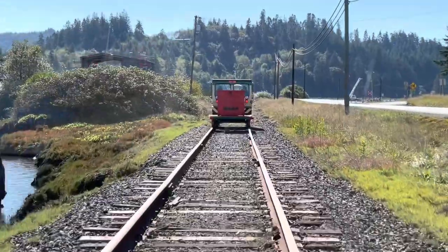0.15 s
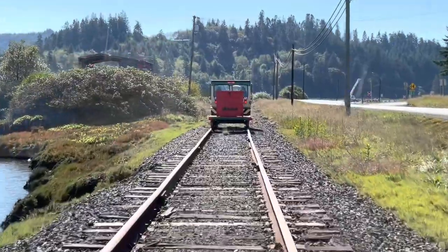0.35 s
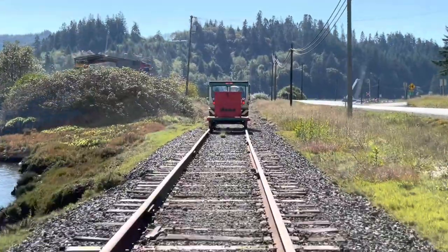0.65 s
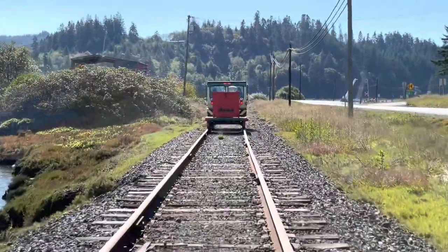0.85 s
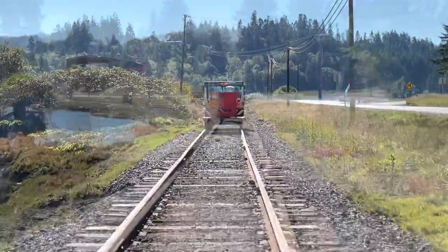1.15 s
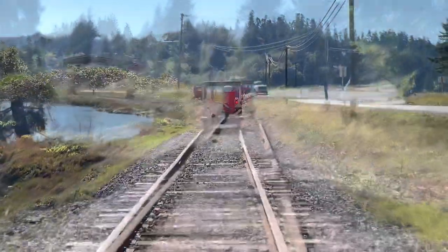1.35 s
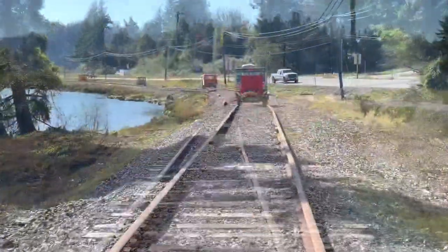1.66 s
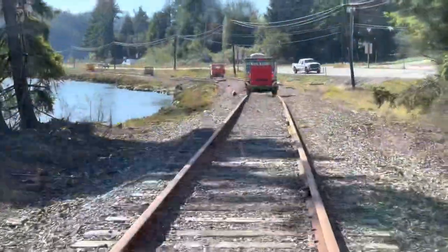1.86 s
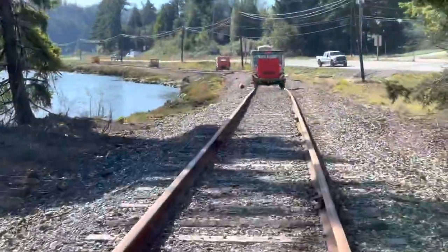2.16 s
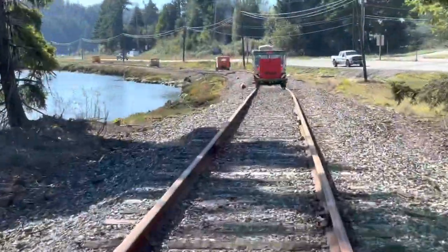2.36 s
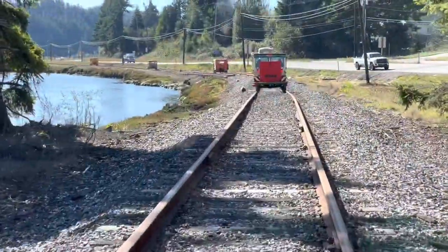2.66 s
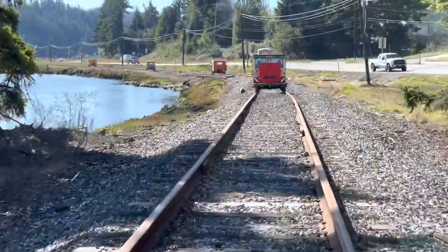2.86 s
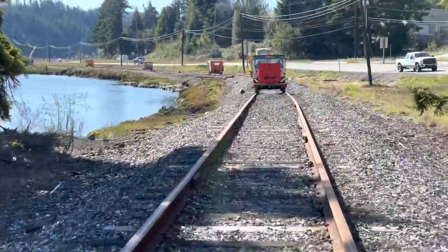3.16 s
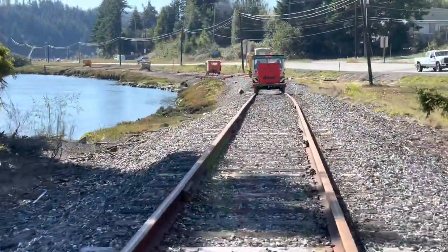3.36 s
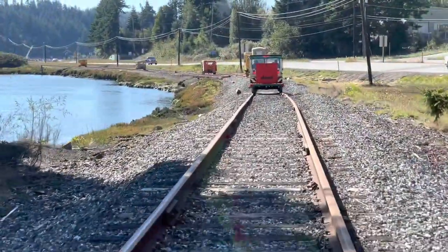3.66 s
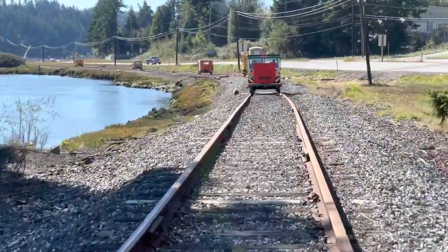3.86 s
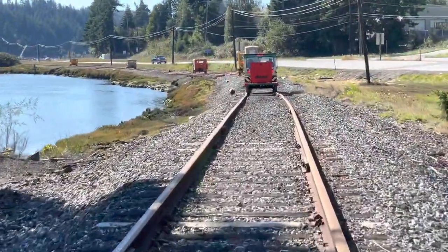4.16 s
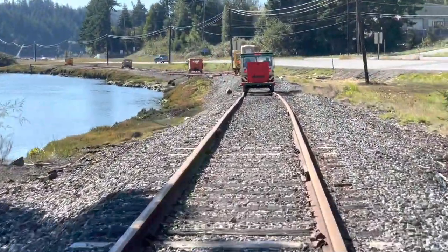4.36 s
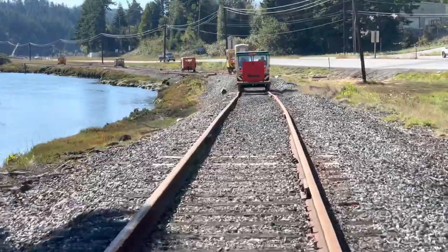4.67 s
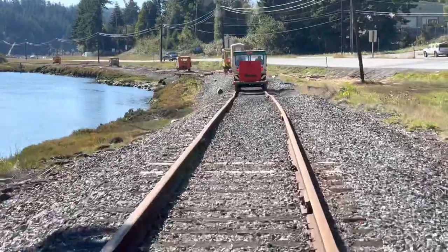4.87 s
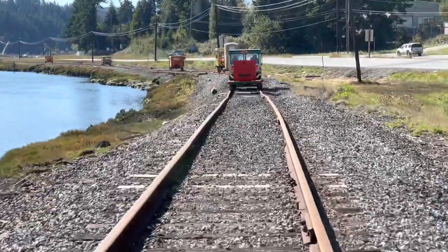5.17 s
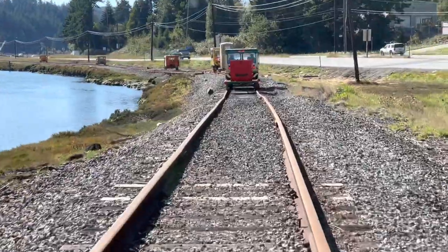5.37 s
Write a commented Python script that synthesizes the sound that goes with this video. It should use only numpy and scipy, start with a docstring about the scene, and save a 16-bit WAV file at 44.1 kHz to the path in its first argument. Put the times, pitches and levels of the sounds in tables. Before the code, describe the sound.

Continuous ride noise, close and in stereo, without voices. A low engine throb and grainy rolling roar fill everything, swelling a few times per second. Fast and whining at first, with brief wheel howls, it blends smoothly into a slower stretch with a buzzing panel drone, strongest around 3.7 to 4.5 seconds. Loose metal pings, bright ticks, jolting rattles and soft low track thumps scatter throughout, ending with a ringing wheel clank.

```python
"""A twin-cylinder engine throbs over the roar of steel wheels on rails: a ride in a small rail motorcar.
Throb: sines locked to the crank. Roar: noise through body and wheel modes, surging about once a wheel turn.
A faster stretch with whine (tones geared to the engine) and short howls dissolves into a slower, droning one.
Treble noise chuffs with the firings and ticks; loose metal pings (decaying modes), jolts rattle (noise bursts).
Track knocks thump the floor (decaying sines); now and then a joint makes a wheel ring (struck modes)."""
import sys
import numpy as np
from scipy import signal
from scipy.fft import rfft, irfft, next_fast_len
from scipy.io import wavfile

SR = 44100
rng = np.random.default_rng(int(sys.argv[2]) if len(sys.argv) > 2 else 0)


def wav_out(sig):
    """Save sig, one row per channel (or a flat mono array), as 16-bit PCM at SR to the path in sys.argv[1]."""
    wavfile.write(sys.argv[1], SR, np.round(np.clip(np.atleast_2d(sig).T, -1, 1) * 32767).astype(np.int16))


N = 242991
TIME = np.arange(N) / SR
SIZE = next_fast_len(N)
HZ = np.maximum(np.arange(SIZE // 2 + 1) * SR / SIZE, 1)


def from_db(db):
    """Decibels to gain."""
    return 10 ** (np.asarray(db) / 20)


def rms_one(x):
    """Scale to rms 1."""
    return x / np.sqrt(np.mean(x ** 2) + 1e-20)


def in_time(rows):
    """Each value column of a time table, interpolated at every sample."""
    s, *columns = np.transpose(rows)
    return [np.interp(TIME, s, c) for c in columns]


def over_hz(points):
    """A frequency table at every bin, linear on a log-frequency axis."""
    hz, value = np.transpose(points)
    return np.interp(np.log(HZ), np.log(hz), value)


def drift(rate_hz):
    """Low-passed noise of rms 1, corner near rate_hz."""
    spectrum = rfft(rng.standard_normal(SIZE)) / (1 + (HZ / rate_hz) ** 2)
    return rms_one(irfft(spectrum, SIZE)[:N])


def resonance(hz, width_hz):
    """Complex response of one mode, 1 at its peak."""
    return 1 / (1 + 1j * (HZ ** 2 - hz ** 2) / (HZ * width_hz))


# left-right likeness of the noises: f/Hz, correlation
LIKENESS = [(90, 1), (170, .9), (280, .68), (390, .75), (520, .55), (800, .2), (1200, .55), (2000, .94),
            (3500, .83), (6000, .7), (7500, .8), (8800, .97), (11000, .85), (13000, .97)]


def stereo_noise(gain):
    """Noise coloured by gain, partly correlated between the sides; rms 1."""
    alike = np.clip(over_hz(LIKENESS), -1, 1)
    mid, side = rfft(rng.standard_normal((2, SIZE))) * gain
    sides = np.sqrt(1 + alike) * mid + np.sqrt(1 - alike) * side * [[1], [-1]]
    return rms_one(irfft(sides, SIZE)[:, :N])


def rough_tone(hz, wander_hz, rough):
    """Tone of rms 1 with wandering pitch and trembling level."""
    turns = np.cumsum(hz + wander_hz * drift(25.37)) / SR
    return rms_one((1 + rough * drift(22)) * np.sin(2 * np.pi * turns))


def swell(s, length):
    """Cosine-squared rise and fall, 1 at time s."""
    return np.cos(np.pi * np.clip((TIME - s) / length, -.5, .5)) ** 2


def dying(s, t60, rise):
    """Envelope of a blow at time s: exponential rise, decay of 60 dB in t60."""
    age = np.maximum(TIME - s, 0)
    return (1 - np.exp(-age / rise)) * from_db(-np.minimum(60 * age / t60, 200))


def puffs(turns, decay, rise):
    """Quick rise and decay each turn (both in turns), each of random strength; rms 1."""
    within = turns % 1
    which = np.floor(turns - turns.min() // 1).astype(int)
    strength = from_db(1.1 * rng.standard_normal(400))[which % 400]
    return rms_one(strength * (1 - np.exp(-within / rise)) * np.exp(-within / decay))


def firings(turns, depth, second_db, decay, rise):
    """Gain that swells twice per engine cycle, strong then weak; rms 1."""
    strong, weak = (puffs(turns - lag, decay, rise) for lag in (0, .5))
    power = strong ** 2 + (from_db(second_db) * weak) ** 2
    return rms_one(np.sqrt(1 + abs(depth) * power))


# exhaust lines, relative: multiple of the cycle rate, level/dB
FAST_ORDERS = [(2, -27), (3, -27), (4, -5.5), (5, -19), (6, 0), (7, -21), (7.5, -12), (8, -20), (10, -12),
               (12, -19), (13, -25), (16, -24), (17, -26), (22, -30), (26, -21), (30, -27), (32, -27),
               (33, -30), (42, -29), (44, -26)]
SLOW_ORDERS = [(3.5, -25), (4, -11), (5, -17.5), (5.5, -22), (6, 0), (7, -16), (7.5, -20), (8.5, -18),
               (10, -18), (12, -19), (14, -18.5), (18, -31), (24, -32), (26, -26), (28, -23), (30, -29),
               (32, -30), (34, -32), (36, -27), (37, -32), (39, -33), (40, -27), (42, -31)]
CHUG_DB, CHUG_RATE_HZ = .6, 14   # drift of the throb's strength


def exhaust(cycles, orders, wobble, uneven):
    """Low throb and growl: lines locked to the crank, with slight drift in timing and in each line's level."""
    turns = cycles + wobble * drift(22)
    lag, growl_from_order, growl_scatter = .08, 20, .8   # cycles, -, turns
    lines = 0
    for k, db in orders:
        # the growl lines' phases are scattered over less than a full turn
        phase = rng.random() * (growl_scatter if k > growl_from_order else 1)
        level = from_db(db) * (1 + uneven * drift(5.0))
        lines = lines + level * np.sin(2 * np.pi * (k * (turns - lag) + phase))
    return rms_one(lines * from_db(CHUG_DB * drift(CHUG_RATE_HZ)))


# wheels bear down about once a turn: t/s of the top, length/s, load
SURGES = [(0.207, 0.13, 0.98), (0.432, 0.28, 1.4), (0.69, 0.16, 1.8), (0.956, 0.14, 1.2), (1.2, 0.16, 1.4),
          (1.475, 0.49, 1.3), (1.77, 0.38, 2.2), (2.036, 0.33, 0.65), (2.294, 0.19, 1.5), (2.657, 0.1, 1.6),
          (2.825, 0.058, 2), (3.07, 0.23, 2.2), (3.517, 0.15, 1.7), (3.83, 0.27, 1.7), (4.153, .17, 2.5),
          (4.325, 0.07, 2.4), (4.483, 0.35, 1.3), (4.66, 0.071, 0.39), (4.85, 0.43, 1.7),
          (5.157, 0.28, 1.2), (5.456, 0.16, 1.7)]
TRACK_ROUGH, TRACK_RATE_HZ = .3, 8   # load flutter from the uneven rail head


def wheel_load():
    """Load of the wheels on the rails: surges plus flutter; mean 0."""
    load = sum(size * swell(s, length) for s, length, size in SURGES)
    load = load + TRACK_ROUGH * drift(TRACK_RATE_HZ)
    return load - load.mean()


# rolling noise colour, relative: f/Hz, density level/dB
FAST_ROAR = [(20, -29), (45, -7), (75, -4.5), (130, 1.5), (190, -6.5), (250, -6.5), (315, -17.5),
             (460, -10.5), (580, -18.5), (900, -18.5), (1300, -26), (1900, -26.5), (4000, -33), (8000, -51)]
SLOW_ROAR = [(20, -20), (30, -10), (45, -6.5), (70, 0), (120, 1), (170, 0.5), (225, -8.5), (270, -5),
             (310, -14.5), (420, -10.5), (580, -16), (700, -16), (1000, -17), (1900, -28), (4000, -36),
             (8000, -48.5)]
# body and wheel resonances: f/Hz, width/Hz, lift/dB
FAST_MODES = [(388, 90, 5), (644, 40, 11), (830, 36, 5), (1114, 63, 10), (1310, 45, 8.5), (1570, 33, 8.5),
              (1880, 49, 3.5), (2270, 55, 3.5), (2910, 110, 5.5), (3770, 130, 4), (4880, 24, 11)]
SLOW_MODES = [(397, 51, 5.7), (500, 26, 2.3), (543, 21, 3.2), (585, 33, 8.1), (950, 12, 4.5),
              (1845, 40, 4.5), (2200, 37, 6.3), (2750, 78, 5.7), (2926, 41, 6.3), (3140, 29, 2.5),
              (3810, 130, 4), (4920, 94, 4.1)]
# engine effort, also drives slow throb, pings and singing: t/s, level/dB
EFFORT = [(0, -0.5), (.9, 2), (1.7, -1), (2.7, 0.5), (4, 0.5), (5.5, 0.5)]
BODY_SWELL_DB_PER_LOAD, SIZZLE_SWELL_DB_PER_LOAD = 1.55, .5


def roar(cycles, load, spectrum, modes, beat, rumble_db, body_db, sizzle_db):
    """Rolling noise through body and wheel modes; the firings modulate the body band."""
    lift = 1
    for hz, width, db in modes:
        lift = lift + (from_db(db) ** 2 - 1) * np.abs(resonance(hz, width)) ** 2
    gain = from_db(over_hz(spectrum)) * np.sqrt(np.maximum(lift, .1))
    shake = firings(cycles, beat, second_db=-6, decay=.1, rise=.15)
    below = 1 / (1 + (HZ / 300) ** 6)
    above = 1 / (1 + (1700 / HZ) ** 6)
    # floor rumbles with the engine, body roars with the track, rails sizzle
    rumble_level = from_db(rumble_db + in_time(EFFORT)[0])
    rumble = rumble_level * stereo_noise(gain * np.sqrt(below))
    body_level = from_db(body_db + BODY_SWELL_DB_PER_LOAD * load)
    body = body_level * stereo_noise(gain * np.sqrt((1 - below) * (1 - above)))
    sizzle_level = from_db(sizzle_db + SIZZLE_SWELL_DB_PER_LOAD * load)
    sizzle = sizzle_level * stereo_noise(gain * np.sqrt(above))
    return rumble + body * shake + sizzle


# drive lines, relative: multiple of the cycle rate, level/dB
WHINE_LINES = [(26.3, 1), (68, -8), (71, -7)]
WHINE_SWELL_DB_PER_LOAD = 6


def whine(cycles, load, wander_hz, level_db):
    """Rough drive tones geared to the engine, surging with wheel load."""
    cycles_per_s = np.gradient(cycles) * SR
    lines = sum(from_db(db) * rough_tone(multiple * cycles_per_s, wander_hz, rough=0.27)
                for multiple, db in WHINE_LINES)
    return from_db(level_db + WHINE_SWELL_DB_PER_LOAD * load) * rms_one(lines)


# engine hiss colour, relative: f/Hz, density level/dB
HISS = [(2000, -4), (4500, 6), (7000, 4.5), (9000, 2), (11000, 7), (13500, 3.5), (15500, -1)]
HISS_SWELL_DB_PER_LOAD = .9


def hiss(cycles, opens, chuff, second_db):
    """Bright, flickering noise chuffing twice per engine cycle, deepest at the very top; rms 1."""
    colour = from_db(over_hz(HISS))
    top = 1 / (1 + (8000 / HZ) ** 8)
    out = 0
    for part, depth in ((top, chuff), (1 - top, .3 * chuff)):
        gain = colour * np.sqrt(part)
        chuffs = firings(cycles - opens, depth, second_db, decay=.16, rise=.07)
        out = out + np.linalg.norm(gain) * stereo_noise(gain) * chuffs   # norm keeps the band balance
    return rms_one(out * from_db(.55 * drift(14)))


# faint wheel tones: f/Hz, level/dB before effort and patches, wander/Hz
SINGING = [(2196, -49, 32), (2940, -54, 28)]


def singing(rough, patchy_db):
    """Rolling contact keeps two wheel modes sounding hoarsely, in uneven patches, louder with effort."""
    out = 0
    for hz, db, wander_hz in SINGING:
        level = from_db(db + in_time(EFFORT)[0] + patchy_db * np.tanh(drift(7)))
        out = out + level * rough_tone(hz, wander_hz, rough)
    return out


# loose metal modes: f/Hz, relative level/dB, t60/s
PING_MODES = [(1867, 1, 0.04), (2185, -2.5, 0.075), (2935, -7, 0.07), (4811, -16, 0.08)]
# loudest taps: t/s, level/dB before loud_db
TAPS = [(.41, -28), (.61, -24), (1.025, -27), (3.13, -22), (3.325, -23), (3.55, -26), (4.19, -25),
        (4.45, -25), (4.85, -37), (5.3, -24)]


def pings(per_s, spread_db, light_db, loud_db, follows):
    """Random light taps, harder with effort, and a few loud ones ring the same decaying metal modes."""
    count = int(per_s * N / SR)
    at = ((np.arange(count) + rng.random(count)) / count * (N - 1)).astype(int)
    loud_at = [int(s * SR) for s, _ in TAPS]
    shaken_db = light_db + follows * in_time(EFFORT)[0][at]
    out = 0
    for hz, db, t60 in PING_MODES:
        taps = np.zeros(SIZE)
        # light taps draw a strength of their own for each mode
        taps[at] = from_db(shaken_db + spread_db * np.clip(rng.standard_normal(count), -2, 2))
        taps[loud_at] = from_db([tap_db + loud_db for _, tap_db in TAPS])
        ring = from_db(db) * dying(0, t60, rise=0.0073) * np.sin(2 * np.pi * hz * TIME)
        out = out + rfft(taps) * rfft(ring, SIZE)
    return irfft(out, SIZE)[:N]


# running gear howls: t/s of the top, length/s, nominal f/Hz, level/dB before gain_db
HOWLS = [(.11, .2, 632, -25), (.225, .12, 600, -29), (.225, .17, 1072, -26), (.225, .1, 835, -32),
         (.43, .1, 845, -33), (.3, .13, 624, -26), (.4, .15, 645, -27), (.495, .13, 629, -25),
         (.63, .14, 1120, -31), (.695, .17, 650, -22), (.71, .14, 1076, -28), (.965, .17, 644, -24),
         (.96, .12, 1125, -33), (1.08, .09, 688, -31), (1.21, .16, 628, -29)]


def howls(wander_hz, rough, gain_db, bend):
    """Short, hoarse, wavering tones; pitch lifts with the swell by the share bend."""
    out = 0
    for s, length, hz, db in HOWLS:
        arch = swell(s, length)
        pitch_hz = hz * (1 + bend * (arch - .7))
        out = out + from_db(db + gain_db) * arch * rough_tone(pitch_hz, wander_hz, rough)
    return out


# jolts: t/s, level/dB before gain_db, centre f/Hz
RATTLES = [(.033, -27, 970), (.225, -39, 1100), (0.417, -24, 1230), (.598, -26, 1700), (.686, -28, 1100),
           (.948, -30, 1400), (1.11, -31, 900), (1.675, -29, 1100), (1.94, -25, 868), (2.312, -24.5, 680),
           (2.64, -22, 556), (2.999, -23, 750), (3.12, -31, 1700), (3.739, -32, 900), (3.79, -27, 700),
           (4.79, -28, 1490), (4.875, -21, 460), (5.144, -30, 600)]


def rattles(t60, grain_db, width, gain_db):
    """Each jolt is a dying burst of grainy band noise; width is a share of the centre frequency."""
    grain = rms_one(from_db(grain_db * drift(150)))
    out = 0
    for s, db, hz in RATTLES:
        clatter = stereo_noise(resonance(hz, width * hz) ** 2)
        out = out + from_db(db + gain_db) * dying(s, t60, rise=0.0045) * clatter
    return grain * out


# engine ticks: t/s, level/dB before gain_db
TICKS = [(.26, -38), (.69, -39), (1.832, -32), (2.888, -37), (3.036, -36), (3.481, -30), (4.052, -32),
         (4.343, -37), (4.42, -36), (4.703, -36), (4.92, -37)]


def ticks(t60, gain_db):
    """Short, very bright metal ticks: enveloped noise around 12.6 kHz."""
    envelope = sum(from_db(db + gain_db) * dying(s, t60, rise=.001) for s, db in TICKS)
    return envelope * stereo_noise(resonance(12600, 4500))


# dull track knocks: t/s, level/dB before gain_db, f/Hz
THUMPS = [(0.529, -10, 121), (.715, -10, 135), (.975, -13, 175), (1.905, -8.5, 159), (2.057, -14, 159),
          (2.447, -12, 175), (2.543, -12, 172), (2.642, -13, 153), (2.739, -14, 178), (2.806, -8, 180),
          (3.345, -10, 169), (3.463, -12, 191), (3.824, -13, 175), (4.164, -13, 255), (4.2, -11, 151),
          (4.364, -10, 135), (4.584, 0, 160), (4.686, -7.5, 150), (4.983, -5.5, 153)]


def thumps(t60, rise, gain_db):
    """The floor booms briefly at each knock: a decaying low sine."""
    return sum(from_db(db + gain_db) * dying(s, t60, rise) * np.sin(2 * np.pi * hz * (TIME - s))
               for s, db, hz in THUMPS)


# panel swells: t/s of the top, length/s, level/dB
DRONE_SWELLS = [(2.05, 0.12, -36), (3.43, 0.31, -30), (3.68, 0.25, -21.5), (3.82, 0.18, -20.5),
                (3.93, 0.18, -22.5), (4.17, 0.096, -26), (4.47, 0.12, -21), (4.8, 0.097, -29)]
DRONE_DB = -41.5   # steady part


def drone(hz, wander_hz):
    """A body panel drones steadily as a rough tone, with short swells."""
    swells = sum(from_db(db) * swell(s, length) for s, length, db in DRONE_SWELLS)
    return (from_db(DRONE_DB) + swells) * rough_tone(hz, wander_hz, rough=0.49)


# wheel strikes a joint: t/s, level/dB
CLANKS = [(3.033, -38), (5.439, -22)]
# wheel modes, relative: f/Hz, level/dB, t60/s, build-up/s
WHEEL = [(640, 2, .07, .004), (904, -2, .15, .004), (1150, -4, .12, .004), (1879, -2.5, .09, .004),
         (2170, 5.5, .075, .004), (2790, -6, .1, .008), (2945, -3.5, .3, .025), (4091, -21, .35, .004),
         (4813, -8, .42, .025)]


def clanks(crack_db, crack_t60, rough):
    """A joint gives a short noise crack and rings the wheel modes, roughened by rolling contact."""
    blows = np.zeros(N)
    blows[[int(s * SR) for s, _ in CLANKS]] = from_db([db for _, db in CLANKS])
    wheel = 0
    for hz, db, t60, rise in WHEEL:
        envelope = from_db(db) * dying(0, t60, rise) * (1 + rough * drift(110))
        wheel = wheel + envelope * np.sin(2 * np.pi * hz * TIME)
    crack = sum(from_db(db + crack_db) * dying(s, crack_t60, rise=0.003) for s, db in CLANKS)
    return signal.fftconvolve(blows, wheel)[:N] + crack * stereo_noise(resonance(2300, 3000) ** 2)


# four-stroke cycle rate: t/s, f/Hz
FAST_SPEED = [(0, 15.43), (.45, 15.86), (.9, 16.17), (1.8, 16.6)]
SLOW_SPEED = [(1, 13.87), (2, 13.65), (2.7, 13.68), (3.4, 13.71), (4.1, 13.82), (5.5, 13.83)]
# exhaust throb on the faster stretch: t/s, level/dB
FAST_THROB = [(0, -11), (.5, -13), (.9, -14), (1.4, -13.5)]
# engine's bark: lag in cycles, depth of its beat in the roar
FAST_BARK, FAST_BEAT = .4, .05
SLOW_BARK, SLOW_BEAT = .15, .1
DISSOLVE_START_S, DISSOLVE_LENGTH_S = 0.95, 0.99


def scene():
    """Two stretches of the ride, linearly cross-faded, plus wheels, loose metal and track knocks."""
    effort_db, = in_time(EFFORT)
    fast, slow = (np.cumsum(in_time(speed)[0]) / SR for speed in (FAST_SPEED, SLOW_SPEED))
    load = wheel_load()

    fast_throb = exhaust(fast - FAST_BARK, FAST_ORDERS, wobble=0.0015, uneven=0.038)
    fast_roar = roar(fast - FAST_BARK, load, FAST_ROAR, FAST_MODES, beat=FAST_BEAT,
                     rumble_db=-21.0, body_db=-21.0, sizzle_db=-35.0)
    fast_hiss = hiss(fast, opens=-0.024, chuff=0.2, second_db=-14)
    fast_ride = (from_db(in_time(FAST_THROB)[0]) * fast_throb + fast_roar
                 + whine(fast, load, wander_hz=23.6, level_db=-39.5)
                 + from_db(-38.0 + HISS_SWELL_DB_PER_LOAD * load) * fast_hiss)

    slow_throb = exhaust(slow - SLOW_BARK, SLOW_ORDERS, wobble=0.00099, uneven=0.047)
    slow_roar = roar(slow - SLOW_BARK, load, SLOW_ROAR, SLOW_MODES, beat=SLOW_BEAT,
                     rumble_db=-21.0, body_db=-22.0, sizzle_db=-36.5)
    slow_hiss = hiss(slow, opens=0.75, chuff=0.46, second_db=-9.5)
    slow_ride = (from_db(effort_db - 12.5) * slow_throb + slow_roar
                 + from_db(-40.0 + HISS_SWELL_DB_PER_LOAD * load) * slow_hiss
                 + drone(hz=383.4, wander_hz=12))

    share = np.clip((TIME - DISSOLVE_START_S) / DISSOLVE_LENGTH_S, 0, 1)
    ride = (1 - share) * fast_ride + share * slow_ride
    wheels = singing(rough=.4, patchy_db=5) + howls(wander_hz=13, rough=.42, gain_db=-2, bend=.035)
    loose_metal = pings(per_s=35, spread_db=5, light_db=-39.5, loud_db=1.5, follows=1)
    clatter = rattles(t60=.19, grain_db=1.5, width=1.2, gain_db=-1)
    knocks = thumps(t60=.14, rise=.004, gain_db=1.3) + clanks(crack_db=-5.3, crack_t60=.2, rough=.35)
    return ride + wheels + loose_metal + clatter + ticks(t60=0.039, gain_db=1.0) + knocks


# phase between the sides: f/Hz, lead of the right/rad
PORTS = [(200, 0), (450, -.4), (750, 0), (2100, 0), (3000, -.45), (5200, -.45), (5800, 1.1), (7000, .8),
         (7900, 1.3), (8500, 2.9), (9300, 3.3), (10300, 4.3), (12000, 5.3), (13000, 2 * np.pi)]
CUTOFF_HZ = 15700


def record(dry):
    """Frequency-dependent balance and phase between the sides, soft peak limit, steep low-pass."""
    # right minus left
    balance_db = over_hz([(85, .3), (150, 2.4), (270, -.9), (400, 0), (520, 2.4), (1000, -.4), (2000, 0)])
    ports = from_db(balance_db / 2 * [[-1], [1]]) * np.exp(1j * over_hz(PORTS) * [[0], [1]])
    heard = irfft(rfft(dry, SIZE) * ports, SIZE)
    rounded = heard / (1 + (heard / .95) ** 10) ** (1 / 10)
    low_pass = 1 / np.sqrt(1 + (HZ / CUTOFF_HZ) ** 500)
    return irfft(rfft(rounded) * low_pass, SIZE)[:, :N]


dry = scene()
out = record(dry)
wav_out(out)
```